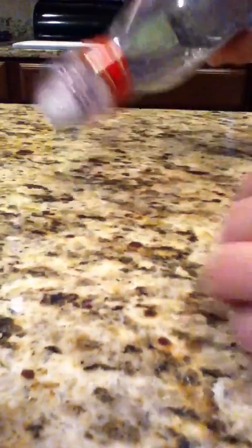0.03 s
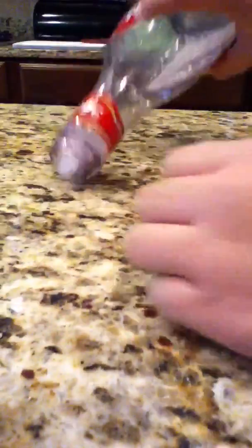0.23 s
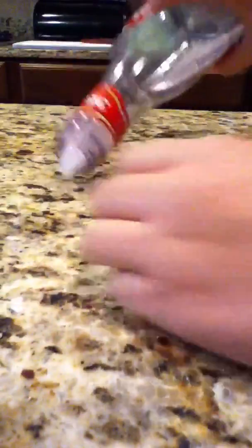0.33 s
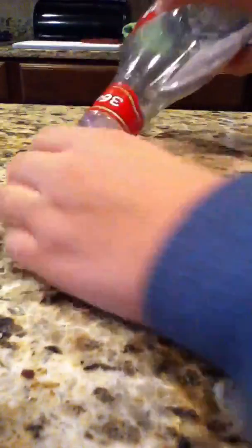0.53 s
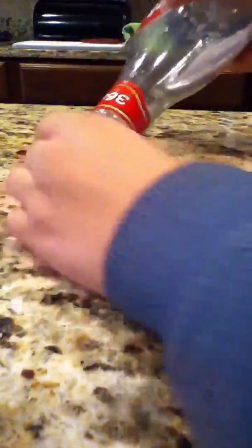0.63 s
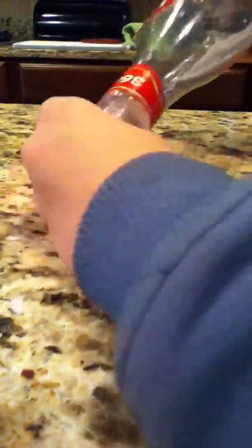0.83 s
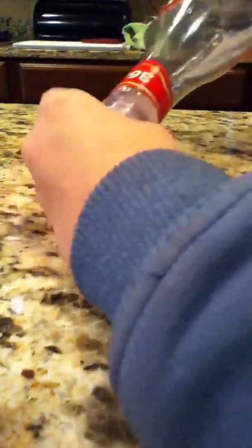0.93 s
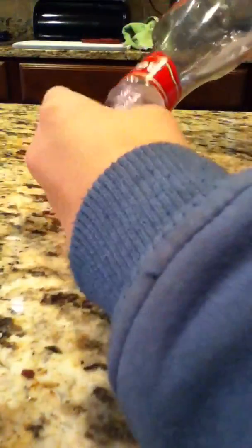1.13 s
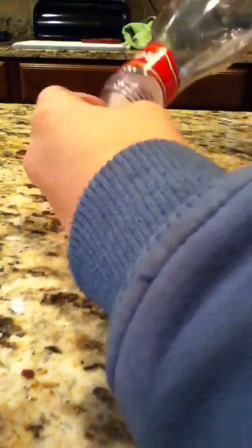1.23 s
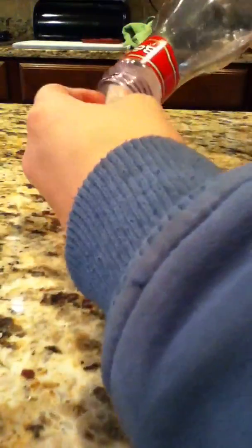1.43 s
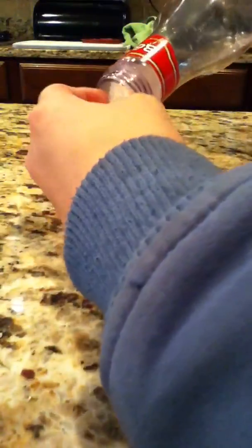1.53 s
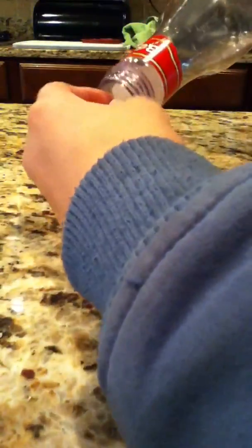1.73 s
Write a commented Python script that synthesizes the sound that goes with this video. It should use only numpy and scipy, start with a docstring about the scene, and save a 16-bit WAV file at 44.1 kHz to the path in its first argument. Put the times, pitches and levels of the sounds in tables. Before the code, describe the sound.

Close by in a small, slightly echoing kitchen, an empty plastic bottle clacks hollowly against the counter and bounces. Its thin wall ticks softly under the fingers, then crackles with a brief squeak and rub as it is gripped.

```python
"""A small hard kitchen, one microphone near the stone counter, quiet room noise and a faint hiss.
At 0.25 s an empty plastic bottle is knocked on the counter; it rattles and lands again at 0.5 s.
Each contact rings the hollow body and cracks the thin shell, and the room echoes it.
Around 1 s the wall ticks and pops faintly under the fingers; from 1.65 s the hand grips the bottle
with a run of cracks, a short squeak and a swelling rub."""
import sys
import numpy as np
from scipy import signal
from scipy.fft import rfft, irfft
from scipy.io import wavfile

SR = 44100
rng = np.random.default_rng(int(sys.argv[2]) if len(sys.argv) > 2 else 0)


def unload_wav(signal):
    """Save mono or channel-first audio to the path in sys.argv[1] as 16-bit WAV at rate SR, clipped to [-1, 1]."""
    wavfile.write(
        sys.argv[1],
        SR,
        np.round(np.clip(np.atleast_2d(signal).T, -1, 1) * 32767).astype(np.int16),
    )


N = 79380

# contacts with counter and hand (time [s], body level [dB], body tilt [dB/octave],
# shell and crack level [dB], shell and crack tilt [dB/octave], favoured frequency [Hz])
CONTACTS = [(0.2492, 1, 7, -2, 0, 4380), (0.2519, -2.5, -4, -5, -2, 2330), (0.2883, -53, 0, -26, 3.5, 4500),
            (0.3007, -58, 14, -23, -1, 2290), (0.3038, -54, 13, -11.5, -2, 2590),
            (0.3115, -24, -1, -25, -7, 2400), (0.359, -24.5, 13, -30, -1.5, 5460),
            (0.3678, -17, 3, -22, 3, 5930), (0.37, -64, 7, -18, -4.5, 1680),
            (0.381, -23.5, 1, -20.5, -6.5, 5500), (0.4978, -9.5, -1.5, -21, 1, 2750),
            (0.5255, -28.5, 6, -33.5, -3, 5000), (0.848, -38, -16, -47, 0, 4200),
            (1.093, -41.5, -12.5, -41, -0.5, 5300), (1.158, -38.5, -18.5, -44, -8, 4180),
            (1.648, -28.5, -5.5, -36.5, -2, 2260), (1.668, -29.5, -5, -57, -2, 3000),
            (1.7102, -18, 5, -22.5, 1, 2910), (1.7417, -19.5, 3.5, -22, 0.5, 8900),
            (1.7644, -36, -8, -31.5, 1, 3760), (1.783, -21, -9, -41, -8, 3730)]
# modes of the hollow body (frequency [Hz], level [dB], t60 [s], after-ring relative to the mode [dB])
BODY_MODES = [(190, -20, 0.061, -18), (270.5, -15, 0.057, -37.5), (346.9, -2.5, 0.18, -26.5),
              (444.5, -8, 0.21, -23), (528.6, -3.5, .15, -20), (623, -4, 0.083, -11), (665, -5, 0.043, -11),
              (696, -5.5, 0.053, -8.5), (764, 1.5, 0.028, -40), (843, -4, 0.04, -28)]
BODY_GAIN_DB, BODY_PIVOT_HZ = -16, 462


def undb(db):
    """Decibels to gain."""
    return 10 ** (np.asarray(db) / 20)


def on_log(hz, points):
    """Levels at hz, interpolated from (frequency [Hz], level [dB]) points on a log axis."""
    table = np.array(points, float)
    return np.interp(np.log(hz), np.log(table[:, 0]), table[:, 1])


def curve(points):
    """Gain over time from (time [s], level [dB]) points."""
    return undb(np.interp(np.arange(N) / SR, *np.array(points, float).T))


def bins():
    """Frequencies of the spectrum, held to at least 1 Hz."""
    return np.maximum(np.arange(N // 2 + 1) * SR / N, 1)


def noise(db):
    """Noise of unit RMS with the given spectrum."""
    x = irfft(rfft(rng.standard_normal(N)) * undb(db), N)
    return x / x.std()


def colour(x, db):
    """Minimum-phase filter with the given gain, so nothing sounds ahead of an attack."""
    cepstrum = irfft(np.log(undb(db)), N)
    cepstrum[1:N // 2] *= 2
    cepstrum[N // 2 + 1:] = 0
    return irfft(rfft(x) * np.exp(rfft(cepstrum)), N)


def fade(t, t60):
    """Exponential decay, 60 dB down at t60."""
    return np.exp(-np.log(1000) * t / t60)


def delay(x, s):
    """The sound, s seconds later."""
    return np.concatenate([np.zeros(int(s * SR)), x, np.zeros(N)])[:N]


def ring(modes, t, gain_db=np.zeros_like, detune=0.0054):
    """Struck modes as decaying sines; the grip shifts their pitch a little from blow to blow."""
    out = 0
    for k, (hz, db, t60, *_) in enumerate(modes):
        shifted_hz = hz * (1 + detune * rng.standard_normal())
        polarity = (-1) ** (k // 2)
        out += polarity * undb(db + gain_db(hz)) * fade(t, t60) * np.sin(2 * np.pi * shifted_hz * t)
    return out


def waver(width_hz):
    """Slow complex noise of unit RMS: a wandering level and phase."""
    offset_hz = np.fft.fftfreq(N, 1 / SR)
    white = rng.standard_normal(N) + 1j * rng.standard_normal(N)
    slow = np.fft.ifft(white * np.exp(-(offset_hz / width_hz) ** 2))
    return slow / slow.std()


def room_noise(air_db=-57):
    """All around the microphone: a low steady room tone and a soft hiss that comes and goes."""
    # spectrum of the room tone (frequency [Hz], relative density [dB])
    air_colour = [(25, -28), (60, -21.5), (134, -1), (190, 2), (300, -6), (450, -2), (560, -10),
                  (800, -2.5), (1100, -14), (2000, -20.5), (4000, -22.5), (8400, -25.5), (16000, -29)]
    # course of the hiss (time [s], level [dB])
    hiss_levels = [(0, -62.5), (.15, -59.5), (.6, -63.5), (.73, -58.5), (.86, -64.5), (1.0, -94.5),
                   (1.8, -73)]
    # spectrum of the hiss (frequency [Hz], relative density [dB])
    hiss_colour = [(500, 28), (2500, 5), (5000, 9), (10000, 12), (16000, -14)]
    air = undb(air_db) * noise(on_log(bins(), air_colour))
    hiss = curve(hiss_levels) * noise(on_log(bins(), hiss_colour))
    return air + hiss


def kitchen(x, tail_db=-15.5, onset_s=0.003):
    """Direct sound, early echoes, then a diffuse tail whose treble dies first."""
    # echoes off the nearby counter and cupboards (delay [s], level [dB])
    echoes = [(.0031, -25), (.0081, -18.5), (0.0108, -16.5)]
    # bands of the reverberation (frequency [Hz], relative density [dB], t60 [s])
    bands = [(100, -21, .5), (333, 1.5, 0.26), (442, 2, .55), (660, -6.5, 1), (850, -13, 0.92),
             (1200, -1, .55), (2177, -4.5, 0.63), (4460, -4, 0.51), (8000, -7.5, 0.4),
             (14000, -10.5, 0.2365)]
    t, hz, tail = np.arange(N) / SR, bins(), 0
    spectrum = rfft(noise(on_log(hz, bands)))
    log_centres = np.log([band[0] for band in bands])
    for selector, (_, _, t60) in zip(np.eye(len(bands)), bands):
        band_share = np.interp(np.log(hz), log_centres, selector)
        tail += irfft(spectrum * band_share, N) * fade(t, t60)
    tail *= 1 - np.exp(-(t / onset_s) ** 2)
    tail *= undb(tail_db) / np.sqrt(np.sum(tail ** 2))
    early = sum(undb(db) * delay(x, s) for s, db in echoes)
    return x + early + signal.fftconvolve(x, tail)[:N]


def hand_rub():
    """Hand and sleeve rub the bottle: dull friction noise, loudest in the grip."""
    # course of the rub (time [s], level [dB])
    rub_levels = [(0, -59), (.2, -53.5), (.6, -69.5), (1.55, -60), (1.64, -54.5), (1.69, -51), (1.75, -44),
                  (1.8, -55.5)]
    # spectrum of the rub (frequency [Hz], relative density [dB])
    rub_colour = [(100, -13.5), (260, -4.5), (420, 0.5), (750, -4.5), (1400, -15), (3500, -20.5),
                  (8000, -30.5), (16000, -50)]
    return curve(rub_levels) * noise(on_log(bins(), rub_colour))


def finger_squeak(start_s=1.679, length_s=0.038, centre_hz=2850, half_width_hz=130, level_db=-48):
    """A finger slides along the bottle's wall: a brief swell of narrow-band noise."""
    progress = np.clip((np.arange(N) / SR - start_s) / length_s, 0, 1)
    resonance_db = -20 * np.log10(1 + ((bins() - centre_hz) / half_width_hz) ** 2)
    return undb(level_db) * np.sin(np.pi * progress) * noise(resonance_db)


def wall_pop(start_s=0.9555, gain_db=-40):
    """The bottle's wall pops once under the fingers and rings briefly."""
    # modes of the popping wall (frequency [Hz], level [dB], t60 [s])
    pop_modes = [(456, -11.5, 0.082), (766, -8, 0.049), (1144, -7, 0.033), (1600, -15.5, 0.058),
                 (2550, 4, 0.012), (2840, -10, 0.0076), (3290, -3, 0.0078), (3780, -1.5, 0.0079),
                 (6200, -11, .006)]
    t = np.arange(SR // 10) / SR
    return undb(gain_db) * delay(ring(pop_modes, t), start_s)


def after_ring(t60_s=0.36, rise_s=0.035):
    """The body's modes hang on faintly after the blows, wavering as they fade."""
    t, out = np.arange(N) / SR, 0
    blow_energy = fade(t, t60_s) ** 2 * (1 - np.exp(-t / rise_s))
    for hz, mode_db, _, after_db in BODY_MODES:
        octaves = np.log2(hz / BODY_PIVOT_HZ)
        energy = sum(undb(body_db + tilt * octaves) ** 2 * delay(blow_energy, s)
                     for s, body_db, tilt, *_ in CONTACTS)
        tone = np.imag(waver(width_hz=9.5) * np.exp(2j * np.pi * hz * t))
        out += undb(BODY_GAIN_DB + mode_db + after_db) * np.sqrt(energy) * tone
    return out


def contact_colour(hz, tilt, spot_hz, floor_hz=1990, pivot_hz=2980, spot_db=9, spot_octaves=0.26):
    """Gain in dB: contact hardness tilts the treble, and the struck spot favours one range."""
    hardness_db = tilt * np.log2(np.maximum(hz, floor_hz) / pivot_hz)
    return hardness_db + spot_db * np.exp(-(np.log2(hz / spot_hz) / spot_octaves) ** 2)


def bottle_knocks(body_rise_s=0.0011, shell_gain_db=-24):
    """Every contact rings the hollow body and the thin shell, and sets off a short dense crack."""
    # modes of the thin shell (frequency [Hz], level [dB], t60 [s])
    shell_modes = [(1185, -10.5, 0.064), (1245, -6.5, 0.14), (1640, -12.5, .06), (1834, -4, 0.068),
                   (2417, -13, 0.048), (2540, -2.5, .035), (3080, -5.5, 0.0515), (3810, -3, .03),
                   (4220, -4.5, 0.031), (4557, -4, 0.037), (5355, -1, 0.031), (5535, -8.5, 0.035),
                   (6190, 1, 0.039), (8340, -7, 0.027)]
    # spectrum of the shell's crack (frequency [Hz], relative density [dB])
    crack_spectrum = [(60, -36.5), (200, -7.5), (400, -0.5), (740, 4.5), (1050, 4), (2400, -0.5),
                      (3100, -6), (4600, -1.5), (6900, -6.5), (8200, -6.5), (11500, -13.5), (16000, -30.5)]
    t, hz, out = np.arange(N) / SR, bins(), 0
    ring_t = t[:SR // 4]
    body_attack = 1 - np.exp(-ring_t / body_rise_s)
    crack_colour = on_log(hz, crack_spectrum)
    crack_colour -= 10 * np.log10(np.mean(undb(crack_colour) ** 2))  # unit power gain
    burst = undb(-12) * fade(t, t60=0.0049) + undb(-18.5) * fade(t, t60=0.043)  # snap, then its tail
    for s, body_db, body_tilt, shell_db, shell_tilt, spot_hz in CONTACTS:
        contact_db = lambda f: contact_colour(f, shell_tilt, spot_hz)
        body = body_attack * ring(BODY_MODES, ring_t, lambda f: body_tilt * np.log2(f / BODY_PIVOT_HZ))
        shell = undb(shell_gain_db) * ring(shell_modes, ring_t, contact_db)
        crack = colour(burst * rng.standard_normal(N), crack_colour + contact_db(hz))
        out += undb(BODY_GAIN_DB + body_db) * delay(body, s)
        out += undb(shell_db) * (delay(shell, s) + delay(crack, s))
    return out


def scene():
    """Bottle and hand close by, the kitchen around them, in mono."""
    bottle = after_ring() + bottle_knocks()
    hand = wall_pop() + finger_squeak() + hand_rub()
    return (kitchen(bottle + hand) + room_noise())[None]


def record(dry):
    """The phone that serves as microphone cuts the treble steeply above 15.9 kHz."""
    return signal.sosfilt(signal.ellip(8, .2, 70, 15900, fs=SR, output="sos"), dry)


dry = scene()
out = record(dry)
unload_wav(out)
```